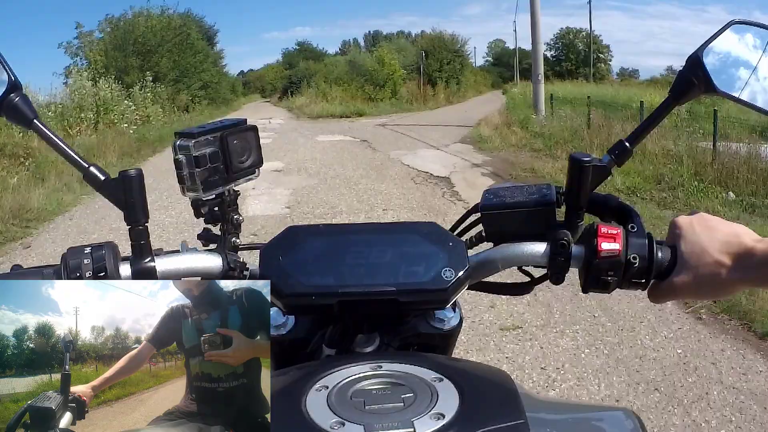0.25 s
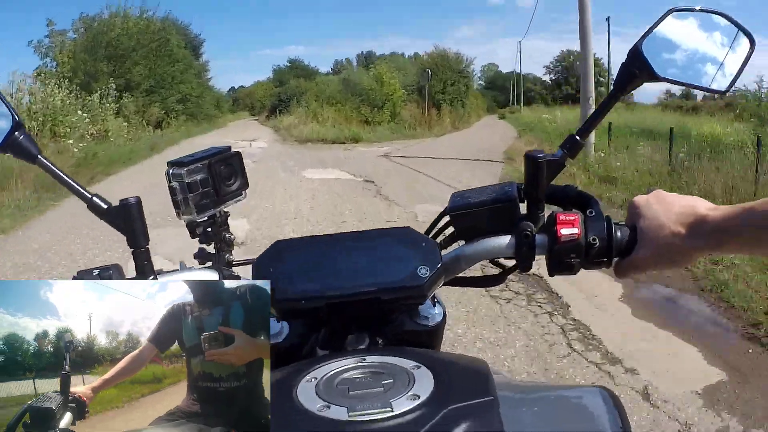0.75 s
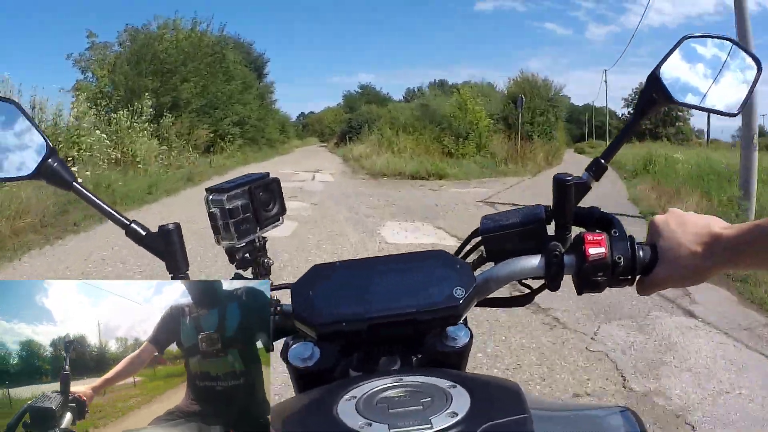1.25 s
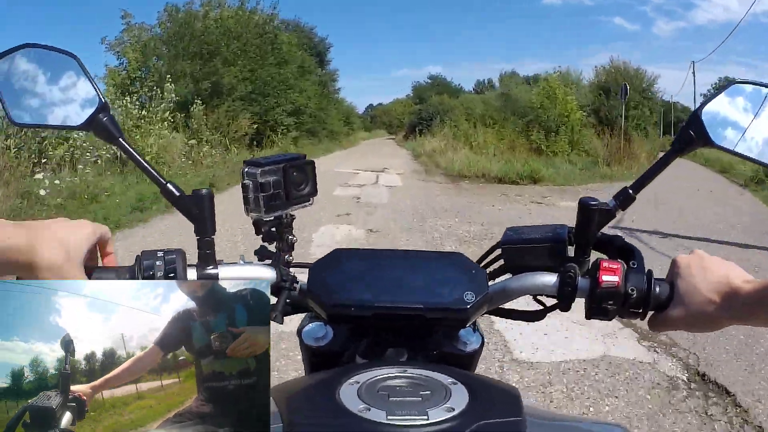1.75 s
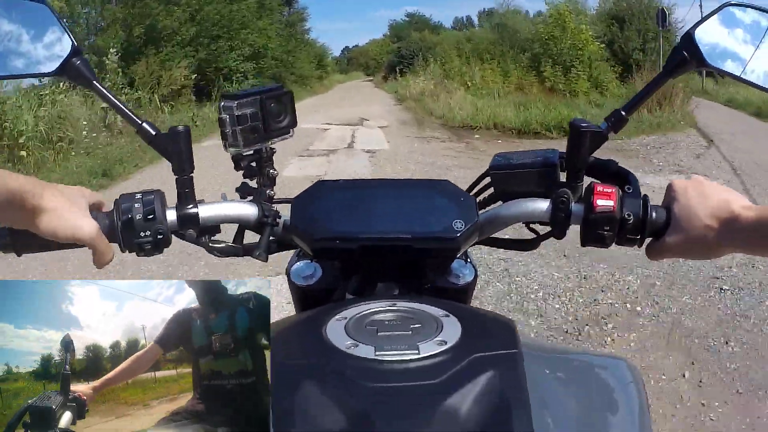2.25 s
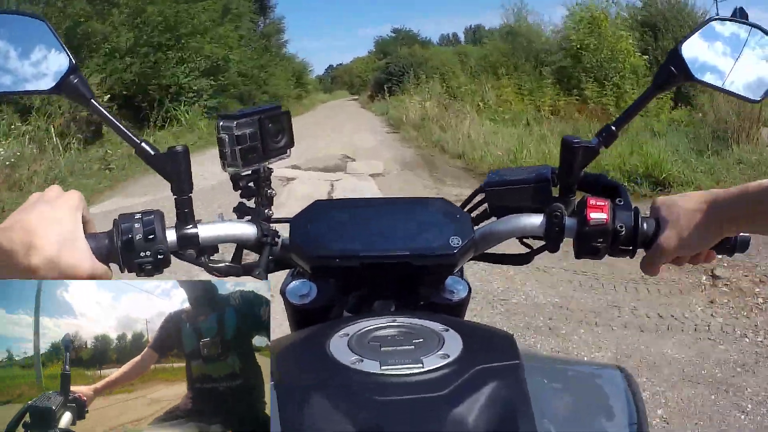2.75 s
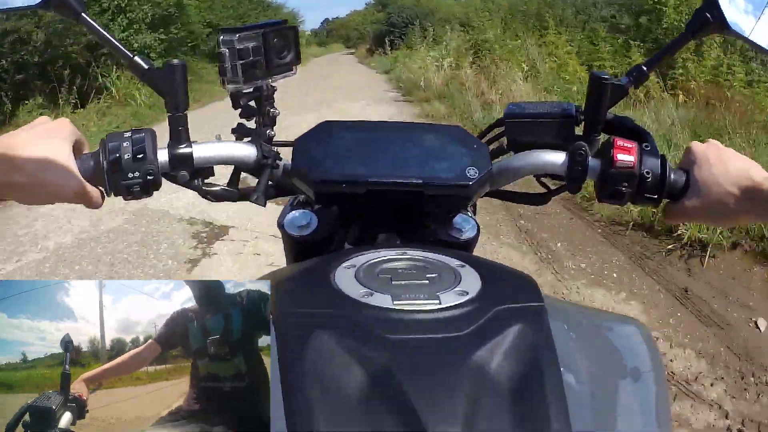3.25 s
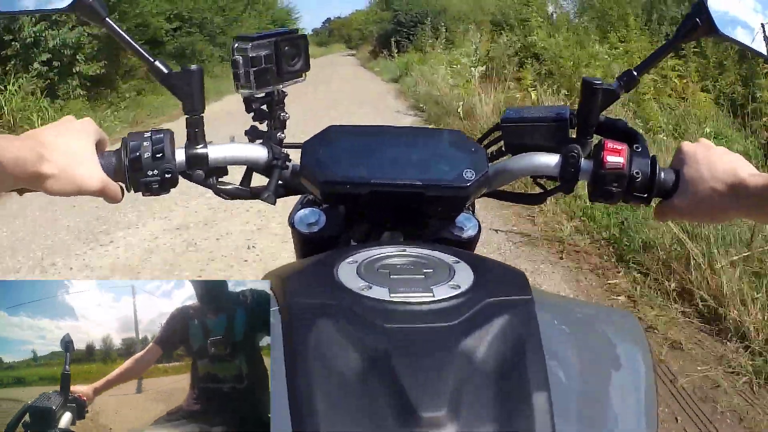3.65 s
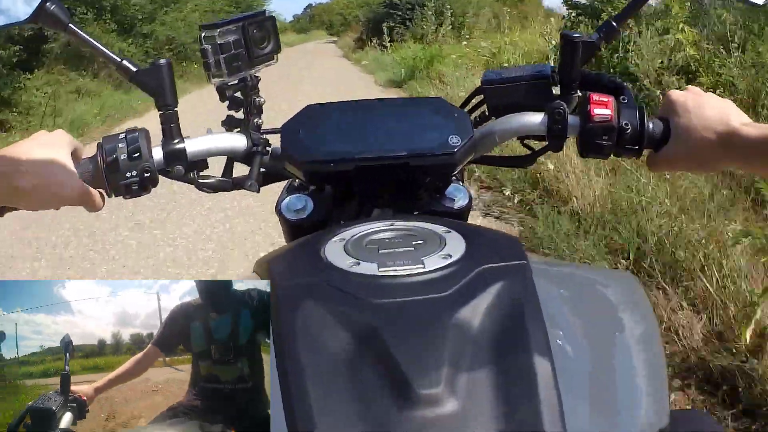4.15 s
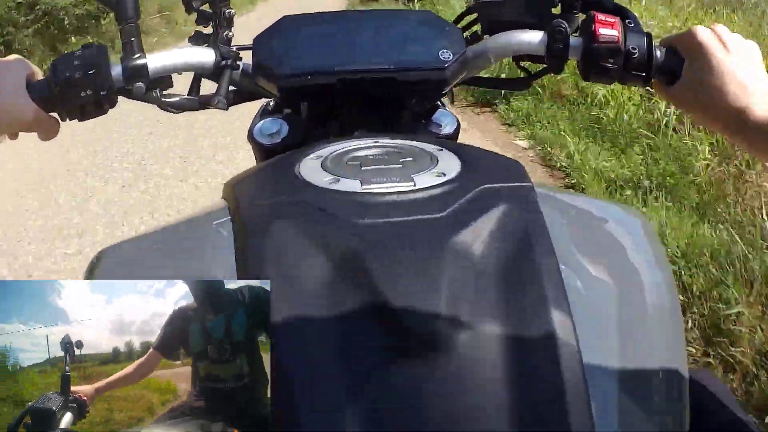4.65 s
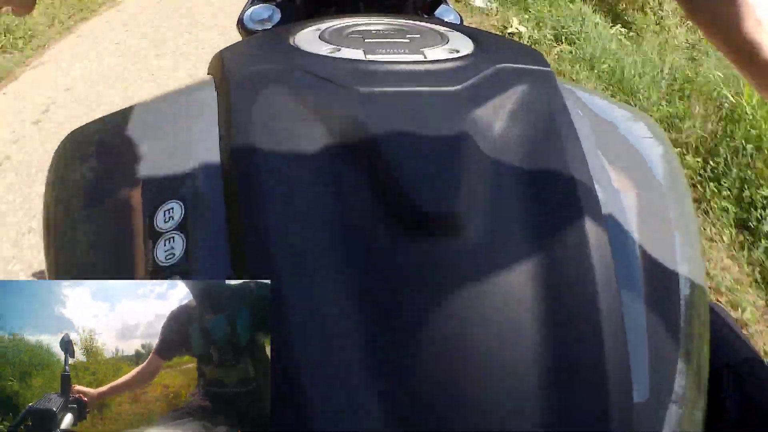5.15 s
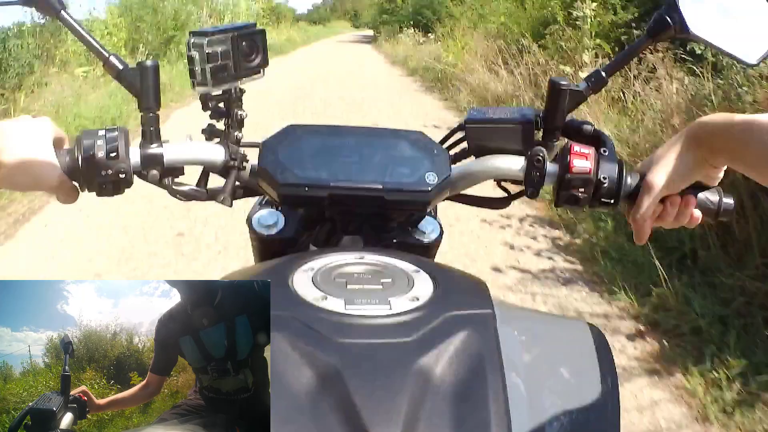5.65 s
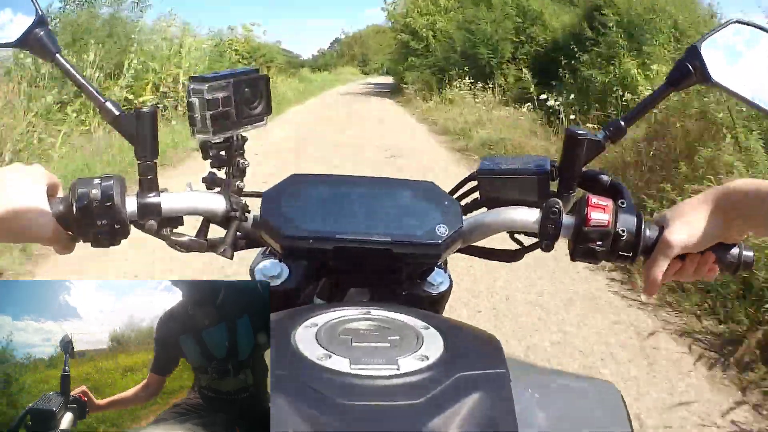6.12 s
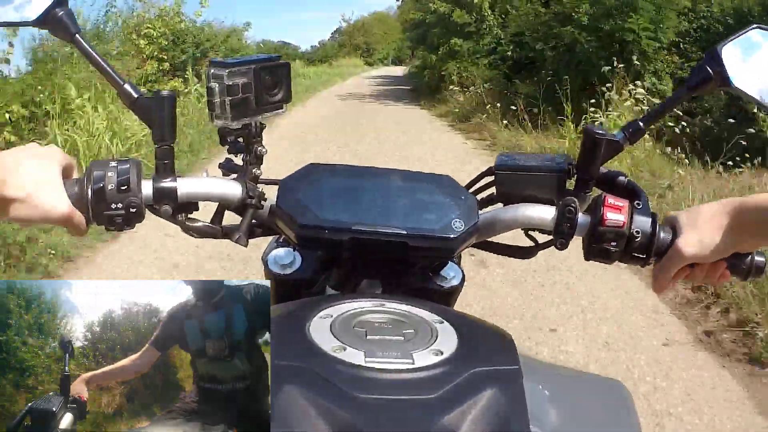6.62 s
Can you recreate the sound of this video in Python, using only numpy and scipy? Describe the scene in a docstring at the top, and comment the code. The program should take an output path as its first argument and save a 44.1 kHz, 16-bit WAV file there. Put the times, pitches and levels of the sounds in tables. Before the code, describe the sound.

Heard from the rider's seat, a motorcycle lopes near idle, accelerates hard, changes gear and eases off as wind rumbles on the microphone.

```python
"""A twin-cylinder motorcycle on a rough track, heard from the rider's chest. It starts near idle, its
cylinders firing unevenly, 270 and 450 crank degrees apart, while stones click and jolts thump. At 2 s
the air box growls with a little throttle, which shuts at 2.4 s and leaves the exhaust thudding. From 3 s
the revs climb to a wide-open snarl with hissing cases and singing overtones. After a shift at 5.6 s the
exhaust thuds again as the revs ease. Wind buffets the microphone throughout."""
import sys
import numpy as np
from scipy import signal
from scipy.fft import rfft, irfft, next_fast_len
from scipy.io import wavfile

SR = 44100
rng = np.random.default_rng(int(sys.argv[2]) if len(sys.argv) > 2 else 0)


def output_pcm(signal):
    """Save a mono or channel-first signal as 16-bit PCM at the path in sys.argv[1].

    Samples are clipped to [-1, 1] before scaling.
    """
    pcm = np.clip(np.atleast_2d(signal).T, -1, 1) * 32767
    wavfile.write(sys.argv[1], SR, np.round(pcm).astype(np.int16))


N = 303408

IDLE_HZ = 25   # four-stroke cycles per second
SECOND_FIRING = 270 / 720   # share of a cycle
# resonances of the intake tract: f/Hz, width/Hz, level/dB
TRACT_MODES = [(534.4, 48.4, 10.5), (571.6, 63.7, 11.5), (666.4, 43, 6)]


def engine():
    """The twin: crank speed and throttle drive its intake, exhaust, valve gear and cases."""
    # engine speed: t/s, cycle rate/Hz
    crank_speed = [(0.0, 26.5), (0.15, 25.3), (0.5, 24.3), (0.78, 24.2), (1.07, 24.8), (1.21, 23.6),
                   (1.74, 24.7), (2.39, 28.6), (2.49, 24.9), (2.91, 18.3), (2.99, 21.9), (3.05, 26.6),
                   (3.1, 29.0), (3.17, 32.3), (3.24, 31.3), (3.35, 27.9), (3.45, 26.0), (3.54, 25.74),
                   (3.72, 26.5), (3.93, 27.22), (4.29, 29.93), (4.44, 32.5), (4.51, 34.6), (4.6, 41.3),
                   (4.73, 47.0), (4.81, 48.7), (4.97, 50.25), (5.29, 50.2), (5.56, 51.6), (5.61, 46.4),
                   (5.67, 43.7), (5.76, 47.2), (5.9, 46.6), (6.0, 45.7), (6.3, 44.06), (6.88, 40.35)]
    # throttle: t/s, opening/0-1
    twist_grip = [(0, 0), (.2, 0.05), (.27, 0.06), (.45, 0.03), (.62, 0.08), (1.65, 0.1), (2.0, 0.2),
                  (2.2, 0.38), (2.385, 0.38), (2.42, 0.02), (2.9, 0), (2.96, 0.08), (3.14, 0.43),
                  (3.3, 0.51), (3.45, 0.36), (3.86, 0.54), (3.93, 0.6), (4.25, 0.69), (4.52, 1), (5.55, 1),
                  (5.62, 0.66), (5.7, 0.51), (5.9, 0.34), (6.17, 0.56), (6.7, 0.5), (6.88, 0.36)]
    rate, = in_time(crank_speed)
    throttle, = in_time(twist_grip)
    cycles = np.cumsum(rate) / SR + .62
    octaves = np.log2(rate / IDLE_HZ)
    shut = np.clip(1 - throttle / .1, 0, 1)
    wide = np.clip((throttle - .6) / .4, 0, 1)
    # A level law weights these five controls. Its columns: idle level/dB, full-throttle gain/dB,
    # gain per octave of speed/dB, change when shut/dB, extra wide open/dB
    controls = np.array([np.ones(N), throttle, octaves, shut, wide])
    # firings even out with speed and grow uneven as the throttle shuts
    lope = (IDLE_HZ / rate) ** 3
    uneven = dict(spread_db=1.2 * lope + 5 * shut, jitter_s=.00008 * lope)
    return (intake_growl(cycles, controls) + intake_snarl(cycles, rate, controls, uneven)
            + exhaust(cycles, controls) + valve_clatter(cycles, rate, controls, uneven)
            + intake_breath(controls) + case_hiss(cycles, octaves, controls) + engine_overtones(cycles))


def intake_growl(cycles, controls):
    """Each intake stroke sucks a low pressure wave through the air box."""
    # level law of the growl (columns in engine)
    growl_law = (-26, 10.5, -10, -7.5, 2)
    order = 5.37 * 2 ** (-.05 * controls[2])   # the pitch rises a little less than the revs
    return from_db(growl_law @ controls + .19 * drift(27)) * gas_strokes(cycles, order, width=.1)


def intake_snarl(cycles, rate, controls, uneven):
    """Valve pulses ring the air box (body), the tract (snarl) and its upper modes (rasp)."""
    # air box and upper tract resonances: f/Hz, width/Hz, level/dB
    body_modes = [(269, 37, -9.5), (393.4, 87, -2), (537, 33, -13.5)]
    rasp_modes = [(750, 60, -18), (851, 85, 3), (924, 70, 7), (1288, 180, -4), (1445, 35, 3.5),
                  (1557, 160, -5.5), (1774, 60, -6), (1865, 53, -13), (2354, 34, -9.5), (2440, 38, -16),
                  (2870, 180, -14.5)]
    # level laws of the three registers (columns in engine)
    body_law = (-43, 4, 1, -16.5, 11)
    snarl_law = (-42, 12, 6, -18.5, 1)
    rasp_law = (-59, 25, 10.5, -4, 2.5)
    opening = cycles + .22   # the valve pulse leads the intake wave
    # gas pulses have no sharp edge
    soft = signal.sosfilt(butter(4, 960), firings(opening, second_db=4, **uneven))
    bright = signal.sosfilt(butter(4, 3140), firings(opening, second_db=2.5, **uneven))
    body = ring_modes(soft, body_modes, rate)
    snarl = ring_modes(duct_echo(soft, delay_s=.00743, db=-6), TRACT_MODES, rate)
    rasp = ring_modes(duct_echo(bright, delay_s=.0075, db=-9.5), rasp_modes, rate)
    return (from_db(body_law @ controls) * body + from_db(snarl_law @ controls) * snarl
            + from_db(rasp_law @ controls) * rasp)


def exhaust(cycles, controls):
    """A thud per firing, strongest on the overrun and after the shift, over a drone at crank speed."""
    # thud: t/s, level/dB
    thud_levels = [(0, -31), (.6, -40.5), (2.39, -55), (2.44, -21.5), (2.85, -27.5), (3.1, -67), (3.3, -70),
                   (3.55, -41.5), (4.1, -47.5), (4.64, -73.5), (5.0, -46.5), (5.6, -21), (6.88, -20)]
    # level law of the drone (columns in engine)
    drone_law = (-47, 18.5, 13, 3, 0.8)
    thud_db, = in_time(thud_levels)
    thud = gas_strokes(cycles - .026, order=3.2, width=.18, lean=.62)
    drone = np.sqrt(2) * np.sin(4 * np.pi * (cycles - .2))
    return from_db(thud_db + .5 * drift(8)) * thud + from_db(drone_law @ controls + .5 * drift(8.6)) * drone


def valve_clatter(cycles, rate, controls, uneven):
    """The valve gear knocks once a cycle, with a faint second knock."""
    # valve gear resonances: f/Hz, width/Hz, level/dB
    clatter_modes = [(710, 120, 1.5), (1130, 150, 0.5), (1353, 120, 4), (1512, 195, 2), (1950, 252, -7.5),
                     (2330, 300, -13.5)]
    # level law of the clatter (columns in engine)
    clatter_law = (-62.5, 2, 25.5, -7, 2)
    knocks = firings(cycles - .1308, second_db=-10.5, **uneven)
    return from_db(clatter_law @ controls) * ring_modes(knocks, clatter_modes, rate)


def intake_breath(controls):
    """Turbulent air rings the intake tract."""
    # level law of the breath (columns in engine)
    breath_law = (-52, 9, -3.5, -7.5, 4)
    breath = ring_modes(rng.standard_normal(N), TRACT_MODES, rate=1)
    return from_db(breath_law @ controls + drift(24)) * breath


def case_hiss(cycles, octaves, controls):
    """The engine cases hiss in puffs that follow the firings, and ring faintly."""
    # hiss spectrum: f/Hz, level/dB
    hiss_colour = [(400, -6), (650, -4), (900, -3.5), (1150, -16), (1500, -6.5), (1950, -12), (2350, -18.5),
                   (2750, -16), (3200, -23.5), (3600, -22.5), (4200, -25), (4900, -30.5), (5600, -38),
                   (8000, -50.5), (15300, -65.5)]
    # level laws of hiss and ring (columns in engine)
    hiss_law = (-46.5, 9, 15, 1, 0)
    ring_law = (-66.5, 3.5, 7, 0.5, -12.5)
    puffs = 1 + .079 * np.cos(2 * np.pi * cycles) + .061 * np.cos(6 * np.pi * cycles)
    hiss = puffs * coloured(hiss_colour) * from_db(hiss_law @ controls + 1.2 * drift(5))
    lows = signal.sosfiltfilt(butter(2, 2500), hiss)
    hiss -= (1 - from_db(-9 * octaves)) * lows   # the low end grows less with speed
    return hiss + from_db(ring_law @ controls + 1.3 * drift(20)) * narrow_hiss(4630, 4630)


def engine_overtones(cycles):
    """Single engine overtones sing out for a while, with a gear whine (order 27) and a rising whistle."""
    # a whistle that climbs with road speed: t/s, f/Hz, level/dB
    whistle = [(4.7, 1240, -75), (4.85, 1290, -42), (5.5, 1630, -39), (5.6, 1640, -75)]
    # tones by order (multiple of the cycle rate): full from t/s, to t/s, level/dB
    overtones = {27: [(2.03, 2.36, -38), (3.15, 3.28, -42.5), (5.831, 6.0, -38.5)], 22: [(2.1, 2.36, -39),
                 (3.38, 4.3, -39)], 12: [(4.78, 5.5, -34.5)], 24: [(4.76, 4.98, -33)],
                 26: [(4.88, 5.53, -36)], 31: [(4.8, 5.53, -39.5)], 20: [(5.9, 6.7, -44)],
                 34: [(5.9, 6.85, -47)], 35: [(5.8, 6.7, -48.5)], 45: [(6.15, 6.78, -51)]}
    rise_s, fall_s = .08, .045
    t = np.arange(N) / SR
    hz, whistle_db = in_time(whistle)
    out = from_db(whistle_db + 3 * drift(3)) * np.sin(2 * np.pi * np.cumsum(hz) / SR)
    for order, spells in overtones.items():
        level = 0
        for start, end, db in spells:
            fade = np.minimum((t - start) / rise_s, (end - t) / fall_s)
            level += from_db(db) * np.exp(np.minimum(0, fade))
        out += level * from_db(2.5 * drift(3.6)) * np.sin(2 * np.pi * order * cycles + .83 * drift(6.6))
    return out


def throttle_plate():
    """Air hisses past the wide-open plate, loudest as it snaps back for the shift."""
    # hiss: t/s, level/dB
    hiss_levels = [(4.5, -67.5), (4.8, -46), (5.2, -39.5), (5.4, -41.5), (5.55, -44), (5.6, -32.5),
                   (5.65, -34), (5.76, -52), (5.85, -80)]
    return from_db(in_time(hiss_levels)[0]) * narrow_hiss(2780, 2880)


def wind():
    """Eddies at the microphone port: a slow, gusting rumble under faster buffeting."""
    # buffeting, growing with road speed: t/s, level/dB
    buffet_levels = [(0, -26.5), (.7, -36), (2.3, -35.5), (2.6, -33), (4.3, -37), (5.4, -16.5), (5.7, -25),
                     (6.88, -27.5)]
    # gusts: crest t/s, lift/dB, half length/s
    gusts = [(0.64, 15.5, 0.052), (1.135, 10, 0.29), (1.65, 7.5, 0.055), (2.631, 14, 0.032),
             (3.159, 6.5, 0.029), (3.285, 13.5, 0.16), (3.628, 12.5, 0.038), (4.141, 13.5, 0.14),
             (4.662, 16, 0.015), (4.367, 10.5, 0.084), (5.24, 7.5, 0.98), (6.186, 6, 0.35)]
    # spectra of rumble and buffeting: f/Hz, level/dB
    rumble_colour = [(8, -9.5), (22, 11.5), (32, 0), (48, -16.5), (70, -31), (300, -62), (4000, -110)]
    buffet_colour = [(20, -16), (50, -3), (90, -13), (140, -15), (220, -18), (400, -39.5), (800, -44.5),
                     (4000, -100)]
    t = np.arange(N) / SR
    buffet_db, = in_time(buffet_levels)
    steady_db = -28.5 + .42 * (buffet_db - buffet_db.mean())
    gust_db = sum(db * np.exp(-((t - s) / half) ** 2) for s, db, half in gusts)
    rumble = from_db(steady_db + gust_db) * coloured(rumble_colour)
    return rumble + from_db(buffet_db + 2.2 * drift(8)) * coloured(buffet_colour)


def stones():
    """Each stone strikes the frame and rattles briefly, some bright, some dull."""
    # hits: t/s, strength/dB, rattle length/s, contact edge f/Hz
    hits = [(0.0, -40, 0.11, 4000), (0.0782, -13, 0.0024, 4960), (0.082, -12, 0.0045, 4400),
            (0.0946, -19.5, 0.0068, 7000), (.107, -34, 0.014, 3500), (0.932, -36, 0.028, 5500),
            (1.006, -28.5, 0.005, 8000), (1.011, -34.5, 0.032, 5500), (1.199, -39, 0.06, 6000),
            (1.231, -13.5, 0.0013, 9000), (1.232, -12, .002, 5000), (2.651, -32.5, 0.014, 5000)]
    # resonances they strike: f/Hz, level/dB
    modes = [(300, -7), (600, -12.5), (1050, -4.5), (1500, -4), (2200, 0), (2800, -3), (3600, -5.5),
             (5200, -7.5), (5900, -8), (7100, -14), (9300, -13), (13500, -35)]
    rattle_db, ring_cycles = -16.5, 11
    contacts, t = np.zeros(N), np.arange(SR // 10) / SR
    for s, db, length, edge_hz in hits:
        grains = rng.standard_normal(len(t)) * (rng.random(len(t)) < .4)
        burst = from_db(rattle_db) * grains * np.exp(-(t / length) ** 2)
        burst[0] = 1   # first contact
        burst = signal.sosfilt(butter(2, [edge_hz / 6, edge_hz], "band"), burst)
        contacts[round(s * SR):][:len(t)] += from_db(db) * burst
    return sum((-1) ** k * from_db(db) * ring(contacts, hz, ring_cycles / hz)
               for k, (hz, db) in enumerate(modes))


def thumps():
    """Jolts through the microphone mount swell quickly and ring low."""
    # jolts: t/s, level/dB, f/Hz, length/s
    jolts = [(.913, -8, 52, .07), (.145, -16, 60, .05), (.207, -16, 70, .05), (1.2272, -18, 125, .03)]
    out, t = np.zeros(N), np.arange(SR // 4) / SR
    for s, db, hz, length in jolts:
        age = t / (.2 * length)   # 1 at the crest
        out[round(s * SR):][:len(t)] += from_db(db) * age * np.exp(1 - age) * np.sin(2 * np.pi * hz * t)
    return out


def gas_strokes(cycles, order, width, lean=0.):
    """Each stroke is a short pressure wave tied to crank angle; lean makes it lopsided."""
    out = 0
    for start, db in ((0, 0), (SECOND_FIRING, 1)):
        angle = (cycles - start + .5) % 1 - .5
        window = np.exp(-(angle / width) ** 2 / 2)
        out -= from_db(db) * window * np.cos(2 * np.pi * order * angle - lean)
    return rms_one(out)


def firings(cycles, second_db, spread_db, jitter_s):
    """One click per firing, each a little early or late, weak or strong."""
    samples = np.arange(N)
    whole = np.arange(-1, int(cycles[-1]) + 1)
    turns = np.sort(np.concatenate([whole, whole + SECOND_FIRING]))
    timing, strength = rng.standard_normal((len(turns), 2)).T
    at = np.interp(turns, cycles, samples, left=-SR, right=-SR)
    at += np.interp(at, samples, jitter_s) * SR * timing
    size = from_db(second_db * (turns % 1 > 0) + np.interp(at, samples, spread_db) * strength)
    inside = (at >= 0) & (at < N - 1)
    clicks = np.zeros(N)
    clicks[at[inside].astype(int)] = size[inside]
    return clicks


def duct_echo(pulses, delay_s, db):
    """Pulses plus their reflection, inverted at the open end of the intake duct."""
    samples = np.arange(N)
    return pulses - from_db(db) * np.interp(samples - delay_s * SR, samples, pulses, left=0)


def ring_modes(x, modes, rate):
    """Rings the modes, signs alternating; the level is evened against engine speed, rms 1."""
    rung = sum((-1) ** k * from_db(db) * resonance(x, hz, width) for k, (hz, width, db) in enumerate(modes))
    return rms_one(rung / np.sqrt(rate))


def ring(x, hz, t60):
    """A unit click sets a sine of height 1 ringing."""
    r, w = from_db(-60 / (t60 * SR)), 2 * np.pi * hz / SR
    return signal.lfilter([0, np.sin(w)], [1, -2 * r * np.cos(w), r * r], x + 1e-18)


def resonance(x, hz, width_hz):
    """Band resonance with gain 1 at its peak."""
    r = np.exp(-np.pi * width_hz / SR)
    poles = [1, -2 * r * np.cos(2 * np.pi * hz / SR), r * r]
    return signal.lfilter([(1 - r * r) / 2, 0, (r * r - 1) / 2], poles, x + 1e-18)


def narrow_hiss(first_hz, second_hz, width_hz=300):
    """Noise through two resonances in series, rms 1."""
    return rms_one(resonance(resonance(rng.standard_normal(N), first_hz, width_hz), second_hz, width_hz))


def coloured(spectrum):
    """Noise with the given spectrum, rms 1."""
    hz, db = np.transpose(spectrum)
    size = next_fast_len(N)
    grid = np.maximum(np.arange(size // 2 + 1) * SR / size, 1)
    gain = from_db(np.interp(np.log(grid), np.log(hz), db))
    return rms_one(irfft(rfft(rng.standard_normal(size)) * gain, size)[:N])


def drift(hz):
    """Slow random wander, rms 1."""
    r = np.exp(-2 * np.pi * hz / SR)
    return rms_one(signal.lfilter([1], [1, -2 * r, r * r], rng.standard_normal(N + SR))[SR:])


def in_time(rows):
    s, *columns = np.transpose(rows)
    return [np.interp(np.arange(N) / SR, s, c) for c in columns]


def butter(order, hz, kind="low"):
    return signal.butter(order, hz, kind, fs=SR, output="sos")


def from_db(db):
    return 10 ** (np.asarray(db) / 20)


def rms_one(x):
    return x / np.sqrt(np.mean(x ** 2) + 1e-20)


def scene():
    """Motorcycle, wind and track over faint microphone hiss, in mono."""
    mic_hiss = from_db(-71.5) * rng.standard_normal(N)
    return (engine() + throttle_plate() + wind() + stones() + thumps() + mic_hiss)[None]


def record(dry):
    """The microphone housing cuts narrow notches; peaks are flattened and the top is cut."""
    # housing notches: f/Hz, width/Hz, level/dB
    notches = [(1009, 64, -32), (1675, 81, -34), (3025, 195, -35)]
    ceiling, knee, cutoff_hz = .58, 8, 15600
    for hz, width_hz, db in notches:
        dry = dry - (1 - from_db(db)) * resonance(dry, hz, width_hz)
    held = dry / (1 + np.abs(dry / ceiling) ** knee) ** (1 / knee)
    return signal.sosfilt(signal.cheby2(12, 60, cutoff_hz, fs=SR, output="sos"), held)


dry = scene()
out = record(dry)
output_pcm(out)
```